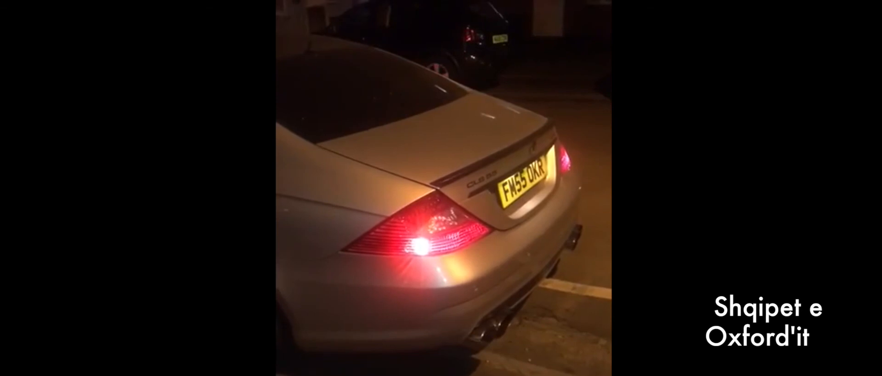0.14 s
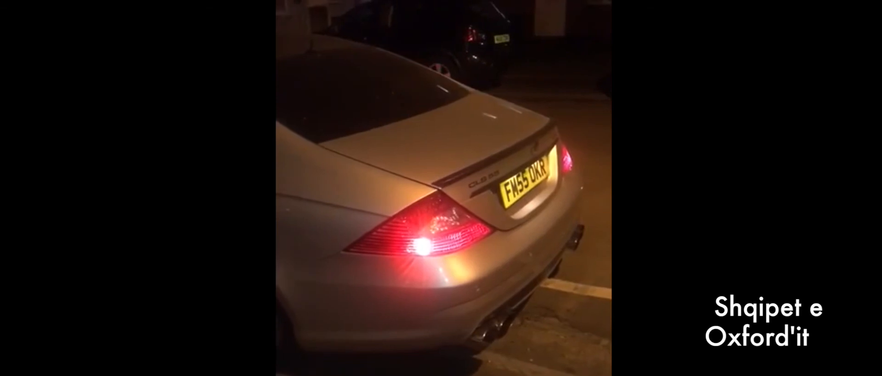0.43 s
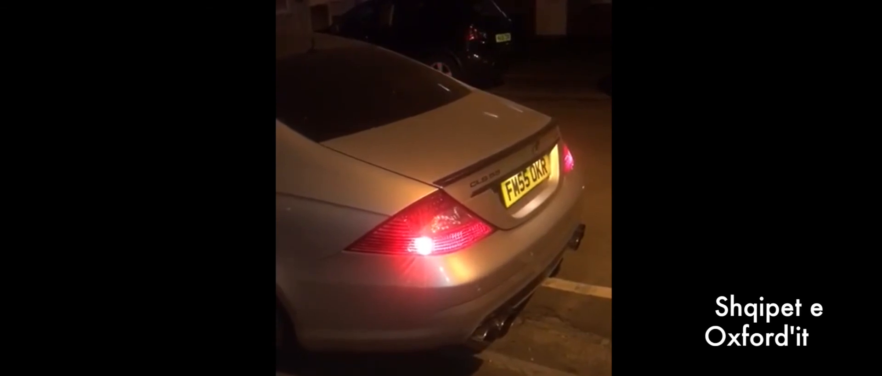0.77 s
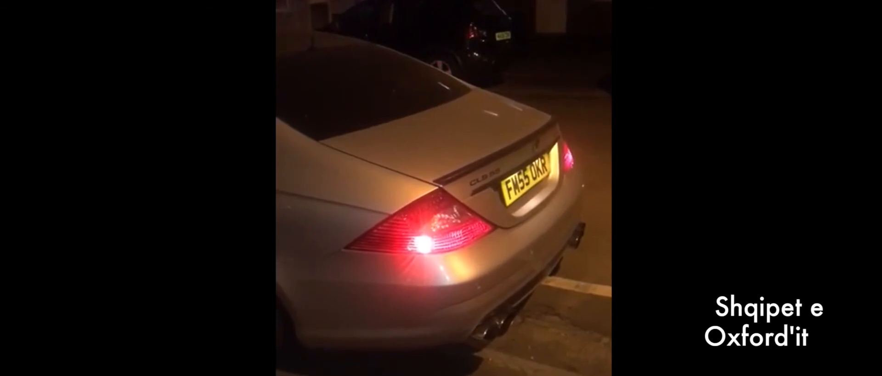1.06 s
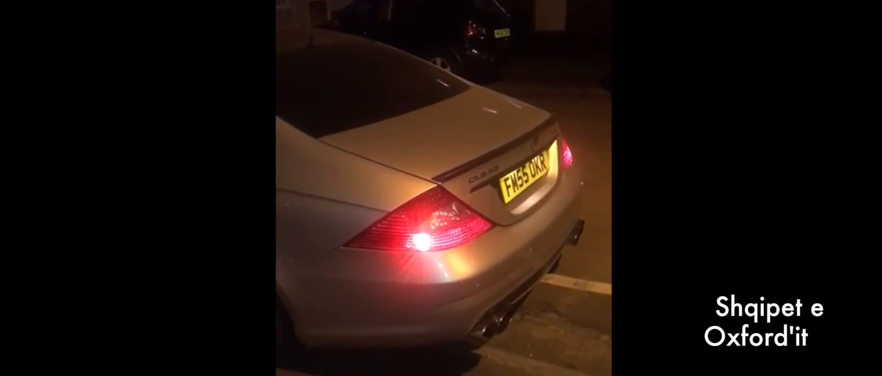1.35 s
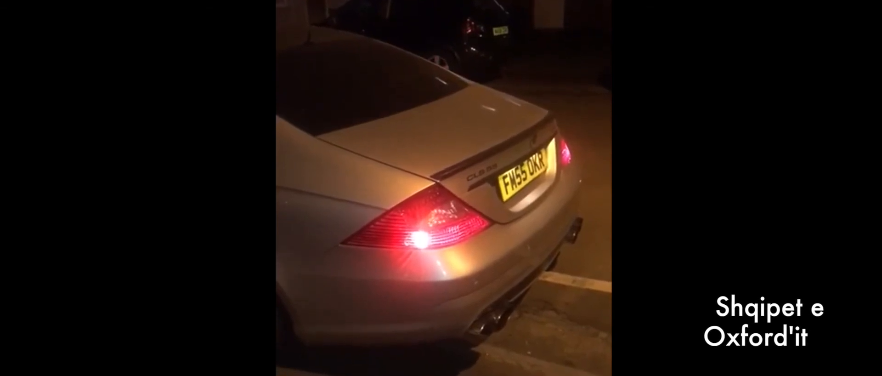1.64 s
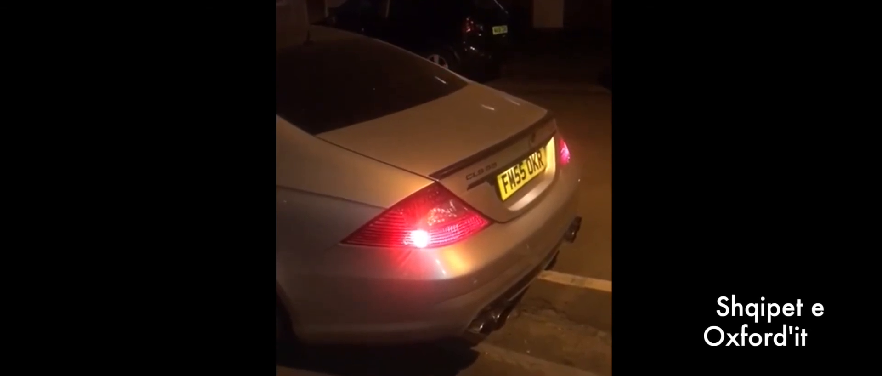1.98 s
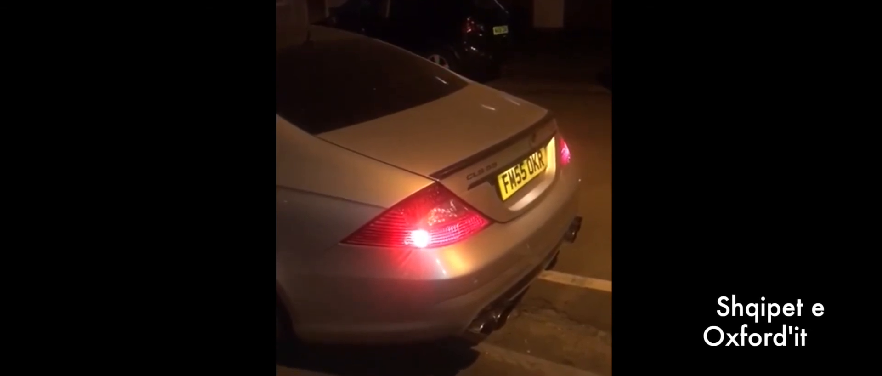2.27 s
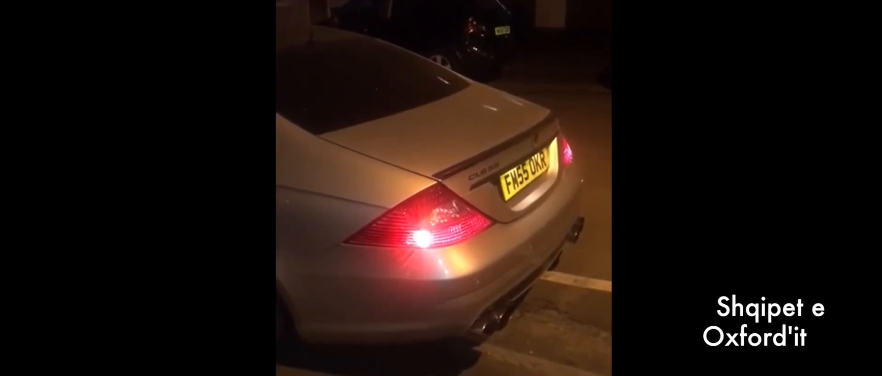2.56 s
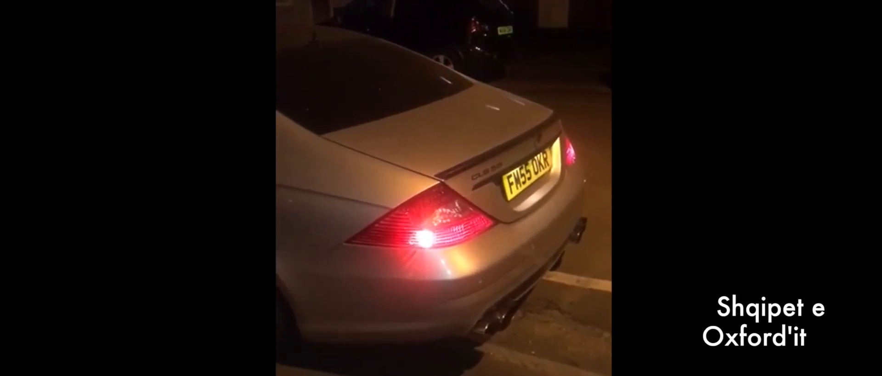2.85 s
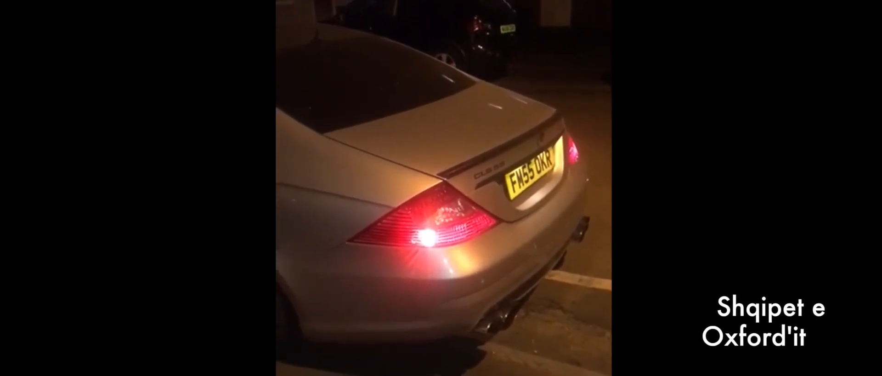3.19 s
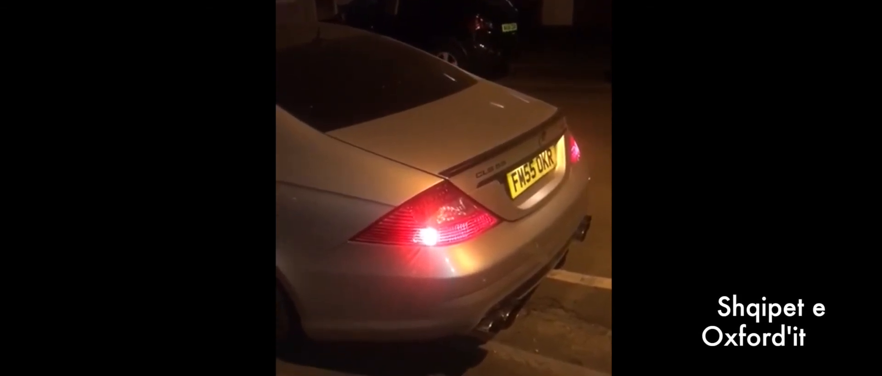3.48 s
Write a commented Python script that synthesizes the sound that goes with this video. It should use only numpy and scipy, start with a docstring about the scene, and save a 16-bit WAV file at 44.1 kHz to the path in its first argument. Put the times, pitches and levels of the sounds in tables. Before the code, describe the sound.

Close microphone at the exhaust outdoors: low boom rises fast into a gassy roar, drops with thumps and a sharp pop, then rumbles at idle with faint hiss and weak echoes from nearby walls.

```python
"""A big V8 is blipped once, heard from just behind its tailpipes in a car park.
Each firing drives the boom, pipe and silencer resonances and gas bursts; all follow one engine speed.
Revs climb with a roar and a jet of gas, burble and crackle on the overrun, then settle to a lumpy idle
with heavy thumps, a faint whine and a hiss of air made of coloured noise."""
import sys
import numpy as np
from scipy import signal
from scipy.fft import rfft, irfft
from scipy.io import wavfile
from scipy.ndimage import uniform_filter1d

SR = 44100
rng = np.random.default_rng(int(sys.argv[2]) if len(sys.argv) > 2 else 0)


def to_wav(s):
    """Save 16-bit WAV."""
    ch = np.atleast_2d(s).T  # columns
    pcm = np.round(np.clip(ch, -1, 1) * 32767)  # PCM
    wavfile.write(sys.argv[1], SR, pcm.astype(np.int16))


N = 159642

# engine speed: t/s, firing rate/Hz
FIRING_RATE = [(0, 53), (.06, 59), (.125, 76), (.18, 91), (.28, 123), (.35, 146), (.41, 162), (.58, 142),
               (.7, 127), (.88, 96), (1.04, 75), (1.16, 66), (1.4, 62), (2.1, 60.1), (2.4, 58.6),
               (2.88, 55.3), (3.2, 55.1), (3.62, 55.9)]
# pipe-tip resonances: f/Hz, width/Hz, level/dB
TIP_RESONANCES = [(2440, 68, -6), (2523, 49, -0.5), (3050, 140, -1.5)]
BURST_ATTACK_S = 0.0019


def undb(db):
    """Decibels to gain."""
    return 10 ** (np.asarray(db) / 20)


def curve(table):
    """A table's points, joined by straight lines in time."""
    rows = np.array(table, float)
    return np.interp(np.arange(N) / SR, rows[:, 0], rows[:, 1])


def sounding(table):
    """Gain from a (t/s, level/dB) table, silent at its lowest point."""
    return undb(curve(table)) - undb(min(db for _, db in table))


def unit(x):
    """Scale to rms 1."""
    return x / np.sqrt(np.mean(x ** 2))


def steady(x, size=7000):
    """Scale to rms 1 over a moving window of size samples, keeping the single beats."""
    power = uniform_filter1d(uniform_filter1d(x ** 2, size), size)
    return x / np.sqrt(np.abs(power) + 1e-12)


def colour(x, points):
    """Filter by an (f/Hz, level/dB) outline, rolled off below its first point."""
    hz, db = np.array(points, float).T
    f = np.arange(N + 1) * SR / (2 * N) + 1
    outline = undb(np.interp(np.log(f), np.log(hz), db))
    low_cut = f ** 2 / (f ** 2 + hz[0] ** 2)
    return irfft(rfft(x, 2 * N) * outline * low_cut)[:N]


def noise(points):
    """Coloured noise of rms 1."""
    return unit(colour(rng.standard_normal(N), points))


def clicks(times, sizes):
    """A train of single pulses."""
    out = np.zeros(N)
    at = np.clip(np.asarray(times) * SR, 0, N - 1).astype(int)
    np.add.at(out, at, sizes)
    return out


def fade(x, decay_s):
    """Give each pulse an exponential tail."""
    return signal.lfilter([1], [1, -np.exp(-1 / (decay_s * SR))], x)


def burst(x, decay_s, attack_s=BURST_ATTACK_S):
    """Give each pulse a quick swell and an exponential tail."""
    return fade(fade(x, decay_s), attack_s) / (attack_s * SR)


def flicker(depth, first_s, second_s):
    """Random gain around 1, smoothed by two time constants."""
    return 1 + depth * unit(fade(fade(rng.standard_normal(N), first_s), second_s))


def ring(x, modes, low_hz, high_hz, order=2):
    """Ring damped resonances, band-limited; a unit pulse peaks at 1."""
    t = np.arange(SR // 3) / SR
    response = sum(undb(db) * np.exp(-np.pi * width * t) * np.sin(2 * np.pi * hz * t)
                   for hz, width, db in modes)
    band = signal.butter(order, [low_hz, high_hz], "band", fs=SR, output="sos")
    response = signal.sosfilt(band, response)
    return signal.fftconvolve(x, response / np.abs(response).max())[:N]


def yard(x):
    """A short, weak wash of echoes from walls and parked cars: decaying noise after 8 ms."""
    wash_db, t60_s = -14, .3
    t = np.arange(SR // 2) / SR
    tail = rng.standard_normal(len(t)) * np.exp(-np.log(1000) * t / t60_s) * (t > .008)
    return x + undb(wash_db) * signal.fftconvolve(x, tail / np.linalg.norm(tail))[:N]


def air_hiss():
    """Air hisses as coloured noise; a brighter hiss swells as the idle is caught."""
    # hiss level: t/s, level/dB
    hiss_level = [(0, -39), (1.2, -47), (1.3, -41), (1.55, -35), (1.76, -36.5), (2.2, -36.5), (2.8, -42),
                  (3.62, -40.5)]
    # hiss spectrum: f/Hz, density/dB per Hz
    hiss_colour = [(200, 23.5), (700, 1.5), (1400, 7.5), (2100, 3), (3800, -1), (6300, 0.5), (7300, -6.5),
                   (8400, -4.5), (10000, -10.5), (12000, -14.5)]
    # swell spectrum: f/Hz, density/dB per Hz
    swell_colour = [(2500, -1), (3800, -7), (4500, 3), (5200, -7), (6300, 5), (7300, -11), (8400, -4),
                    (12000, -20)]
    swell_s, spread_s, swell_db = 1.54, 0.075, -40.5
    swell = undb(swell_db) * np.exp(-((np.arange(N) / SR - swell_s) / spread_s) ** 2 / 2)
    return noise(hiss_colour) * undb(curve(hiss_level)) + noise(swell_colour) * swell


def whine(phase):
    """High multiples of the firing rate waver as it falls: the lower briefly, the higher held faintly on."""
    # whines: multiple of firing rate, level rows (t/s, level/dB)
    whines = [(4.5, [(.44, -67), (.49, -45), (.56, -34), (.64, -50), (.72, -65)]), (9, [(1.02, -63),
              (1.06, -36), (1.15, -47), (1.3, -46), (1.65, -51)])]
    tones = sum(sounding(rows) * np.sin(2 * np.pi * multiple * phase) for multiple, rows in whines)
    return flicker(0.2, 0.0049, 0.0043) * tones


def misfires():
    """Late burns: dull thumps ring the silencer; noise bursts make crackles and sharp backfires."""
    # heavy firings that thump the silencer: t/s, level before trim/dB
    thump_hits = [(0.681, -6), (0.789, -12.5), (0.893, -7.5), (1.249, -13.5), (1.275, -18), (1.869, -16.5),
                  (1.881, -7), (2.015, -8), (2.066, -10), (2.148, -8.5), (2.269, -13.5), (2.285, -7.5),
                  (2.402, -17), (2.416, -7), (2.546, -17), (2.557, -16), (2.702, -11.5), (3.265, -16),
                  (3.494, -16.5)]
    # silencer thump resonance: f/Hz, width/Hz, level/dB
    thump_mode = [(340, 27, 0)]
    # crackles of unburnt fuel in the pipes: t/s, level before trim/dB
    crackle_hits = [(0.096, -12), (0.21, -8.5), (0.2555, -18), (0.3325, -9), (0.6834, -16), (0.7407, -23.5),
                    (0.7891, -22.5), (0.9517, -17.5), (0.989, -25), (0.999, -20.5), (1.012, -19),
                    (1.0378, -32), (1.064, -21), (1.079, -21), (1.093, -20), (1.832, -23.5),
                    (2.0155, -23.5), (2.066, -29), (2.097, -23), (2.147, -25.5), (2.232, -34),
                    (2.3814, -20), (2.8424, -28.5), (3.0784, -24), (3.366, -22.5), (3.495, -24),
                    (3.53, -22)]
    # crackle spectrum: f/Hz, density/dB per Hz
    crackle_colour = [(700, 5), (1400, 5), (1900, 0), (2600, 2.5), (4500, -16.5), (12000, -28.5)]
    # sharp backfires: t/s, level/dB
    pop_hits = [(.8935, -14.5), (0.973, -27)]
    # backfire spectrum: f/Hz, density/dB per Hz
    pop_colour = [(300, 2), (500, 16), (700, 1.5), (1000, 11.5), (1400, 8), (2000, -6.5), (3500, -9),
                  (5000, -11.5), (8000, -14), (12000, -18)]
    thump_trim_db, crackle_trim_db = -0.5, -2
    crackle_decay_s, pop_decay_s = 0.0032, 0.0057

    at, db = np.array(thump_hits).T
    thumps = ring(clicks(at, undb(db)), thump_mode, low_hz=247, high_hz=443, order=3)
    at, db = np.array(crackle_hits).T
    crackles = burst(clicks(at, undb(db + crackle_trim_db)), crackle_decay_s) * noise(crackle_colour)
    at, db = np.array(pop_hits).T
    pops = burst(clicks(at, undb(db)), pop_decay_s) * noise(pop_colour)
    return undb(thump_trim_db) * thumps + crackles + pops


def jet(phase):
    """Under throttle every firing shoots a crack of gas that rings the pipe tips; top hiss flows more evenly."""
    # gas jet level: t/s, level/dB
    jet_level = [(0, -50), (.08, -34.5), (.098, -24), (.21, -21), (.27, -26), (.34, -28), (.42, -37.5),
                 (.48, -41.5), (1.1, -52)]
    # gas jet spectrum: f/Hz, density/dB per Hz
    jet_colour = [(600, -2), (1150, 2.5), (2550, 5.5), (2850, -2), (3150, 8.5), (3700, -0.5), (5000, -6),
                  (8300, -9.5), (12000, -18)]
    delay_turns, attack_s, decay_s = .47, .0008, .0035  # delay in firing periods
    floor, scatter_db, split_hz = .1, 3, 4200

    def gas(side):
        sos = signal.butter(2, split_hz, side, fs=SR, output="sos")
        return signal.sosfilt(sos, noise(jet_colour))

    at = np.flatnonzero(np.diff(np.floor(phase - delay_turns))) / SR
    sizes = undb(scatter_db * rng.standard_normal(len(at)))
    gate = steady(floor + burst(clicks(at, sizes), decay_s, attack_s))
    cracks = gate * gas("low")
    rung = unit(ring(cracks, TIP_RESONANCES, low_hz=2160, high_hz=3730))
    return (cracks + .5 * rung + np.sqrt(gate) * gas("high")) * undb(curve(jet_level))


def roar(phase):
    """Under throttle multiples of the firing rate flutter as they climb through the silencer's resonance."""
    # roar level: t/s, level/dB
    roar_level = [(.1, -36), (.2, -18), (.26, -10), (.33, -14), (.41, -12.5), (.47, -36)]
    # roar tones: multiple of firing rate, level/dB
    roar_orders = [(2, 0), (2.375, -4), (2.5, -3), (3, 0)]
    resonance_hz, half_width_hz = 345, 48
    flutter_depth, flutter_s = .55, .004
    tones = np.zeros(N)
    for multiple, db in roar_orders:
        detuning = (multiple * curve(FIRING_RATE) - resonance_hz) / half_width_hz
        passed = 1 / np.hypot(1, detuning ** 2)
        flutter = flicker(flutter_depth, flutter_s, flutter_s)
        tones += undb(db) * passed * flutter * np.sin(2 * np.pi * multiple * phase)
    return tones * sounding(roar_level)


def tailpipes(envelope):
    """Bursts of turbulent gas, heard directly and through the ring of the tailpipes."""
    # gas spectrum: f/Hz, density/dB per Hz
    rasp_colour = [(300, 17), (480, 4), (720, -2), (1100, 0.5), (1500, 8), (1950, -6.5), (2450, 8),
                   (2900, -23), (3600, 1.5), (4400, -29), (8000, -45), (12000, -53)]
    # tailpipe resonances: f/Hz, width/Hz, level/dB
    tailpipe_modes = [(987, 130, 6), (1180, 95, 0.5), (1244, 54, -2), (1480, 98, -0.5), (1650, 73, -3),
                      (2290, 42, -11), (2660, 35, -12), (3183, 24, 7)]
    ring_db = -2.5  # relative to direct gas
    gas = envelope * noise(rasp_colour)
    rung = ring(gas, tailpipe_modes, low_hz=700, high_hz=4400)
    return (gas + undb(ring_db) * unit(rung) * np.std(gas)) / np.sqrt(2)


def exhaust(phase):
    """Each firing rocks the pipes by its bank, rings the silencer, pings the tips and puffs out gas."""
    # cylinder bank of successive firings: sign
    banks = (1, -1, 1, 1, -1, 1, -1, -1)
    # spread of firing strength, greatest with the throttle shut: t/s, spread relative to bank pulse
    uneven = [(0, 0.18), (.36, 0.29), (.46, 1.3), (.95, 1.1), (1.2, 0.4), (3.62, 0.25)]
    # pipe resonances: f/Hz, width/Hz, level/dB
    pipe_modes = [(95.4, 25, 14), (129.7, 6.1, 1)]
    # uneven beat of the two banks: t/s, level/dB
    lope_level = [(0, -16), (.22, -18), (.38, -27.5), (.47, -19.5), (.6, -20.5), (.69, -17), (.76, -30),
                  (.82, -15.5), (.93, -30), (1.0, -29), (1.15, -30.5), (1.8, -24), (3.62, -30)]
    # whole-pipe resonance: f/Hz, width/Hz, level/dB
    chug_mode = [(58, 13, 0)]
    # deep chug under ragged firings: t/s, level/dB
    chug_level = [(0, -21), (.36, -29), (.47, -21), (.58, -31), (.69, -15), (.8, -19), (.92, -20.5),
                  (1.05, -26), (1.25, -28)]
    # silencer resonances: f/Hz, width/Hz, level/dB
    silencer_modes = [(257, 230, -12), (344.3, 43.4, -1), (386, 72, -18)]
    # silencer ring: t/s, level/dB
    drone_level = [(0, -28.5), (.17, -16.5), (.26, -12), (.42, -16), (.46, -19.5), (.62, -20.5), (.7, -16),
                   (.82, -26.5), (1.1, -20.5), (1.2, -30), (1.65, -28), (2.1, -24.5), (2.9, -29.5),
                   (3.62, -26)]
    # gas rasp at the tailpipes: t/s, level/dB
    rasp_level = [(0, -38), (.075, -33.5), (.11, -24.5), (.34, -27.5), (.47, -38.5), (.85, -42.5),
                  (.93, -44.5), (1.07, -31.5), (1.15, -46.5), (2.05, -40), (2.9, -41.5), (3.62, -42)]
    # ping of the pipe tips: t/s, level/dB
    tip_level = [(0, -63), (.3, -41), (.42, -38), (.5, -57), (1.05, -49), (1.2, -59), (2.2, -44),
                 (2.9, -58), (3.62, -49)]
    bank_share, timing_jitter_s = 0.063, 0.000678
    strength_scatter_db, puff_scatter_db, tip_scatter_db = 2.5, 5.5, 6
    puff_decay_s, puff_floor = 0.0054, 0.22
    turbulence = 1  # gas noise in the silencer, relative to the pulses

    def silencer(x):
        return steady(ring(x, silencer_modes, low_hz=163, high_hz=422))

    index = np.flatnonzero(np.diff(np.floor(phase)))
    jitter, ragged, scatter, puff_scatter, tip_scatter = rng.standard_normal((len(index), 5)).T
    bank = np.resize(banks, len(index))
    at = index / SR + timing_jitter_s * jitter
    strength = 1 + bank_share * bank

    puff_sizes = strength * undb(puff_scatter_db * puff_scatter)
    puffs = steady(puff_floor + burst(clicks(at, puff_sizes), puff_decay_s))

    bank_pulses = clicks(at, bank + curve(uneven)[index] * ragged)
    lope = steady(ring(bank_pulses, pipe_modes, low_hz=66.0, high_hz=170.6, order=4))
    chug = steady(ring(clicks(at, ragged), chug_mode, low_hz=46.5, high_hz=75, order=3))

    pulses = clicks(at, strength * undb(strength_scatter_db * scatter))
    drone = silencer(pulses) + turbulence * silencer(puffs * rng.standard_normal(N))
    drone = steady(drone, size=3500)

    tip_pulses = clicks(at, undb(tip_scatter_db * tip_scatter))
    tips = steady(ring(tip_pulses, TIP_RESONANCES, low_hz=2150, high_hz=3700))

    low = chug * undb(curve(chug_level)) + lope * undb(curve(lope_level))
    rasp = tailpipes(puffs * undb(curve(rasp_level))) + tips * undb(curve(tip_level))
    return low + drone * undb(curve(drone_level)) + rasp


def boom(phase):
    """The clean pressure wave at the firing rate and its octave."""
    # firing-rate tone: t/s, rms level/dB
    boom_level = [(0, -12), (.06, -10), (.19, -4.5), (.28, -17.5), (.35, -17), (.42, -50), (.55, -43),
                  (.7, -24), (.88, -27), (1.12, -21.5), (1.54, -13), (2.1, -12), (2.42, -10), (2.9, -13),
                  (3.62, -12)]
    # octave tone: t/s, rms level/dB
    octave_level = [(0, -25), (.25, -28.5), (.45, -75), (.95, -44.5), (1.3, -23), (1.8, -22.5), (2.6, -30),
                    (3.1, -28.5), (3.62, -25.5)]
    octave_turns = 0.7
    first = undb(curve(boom_level)) * np.sin(2 * np.pi * phase)
    second = undb(curve(octave_level)) * np.sin(2 * np.pi * (2 * phase + octave_turns))
    return -np.sqrt(2) * (first + second)


def scene():
    """One engine speed drives boom, exhaust, roar, jet and whine; misfires and air hiss are added."""
    phase = np.cumsum(curve(FIRING_RATE)) / SR  # turns, one per firing
    echoed = exhaust(phase) + roar(phase) + jet(phase) + misfires() + whine(phase)
    return (boom(phase) + yard(echoed) + air_hiss())[None]


def record(dry):
    """Rounds the highest peaks, then cuts the top."""
    limit, top_hz = .95, 11900
    held = dry / (1 + (dry / limit) ** 12) ** (1 / 12)
    return signal.sosfilt(signal.ellip(10, .2, 90, top_hz, fs=SR, output="sos"), held)


dry = scene()
out = record(dry)
to_wav(out)
```